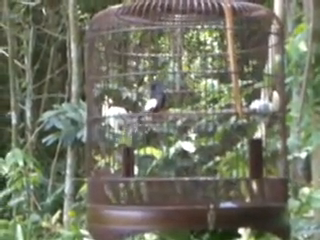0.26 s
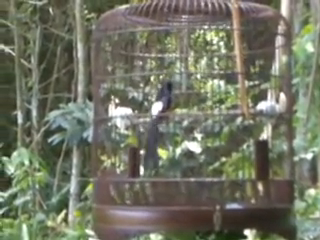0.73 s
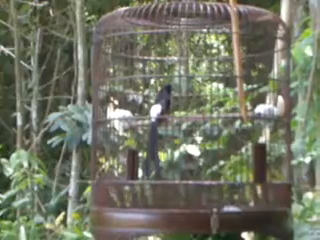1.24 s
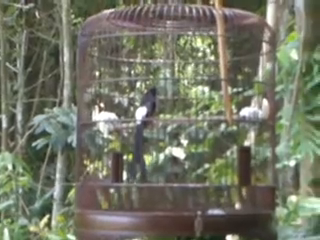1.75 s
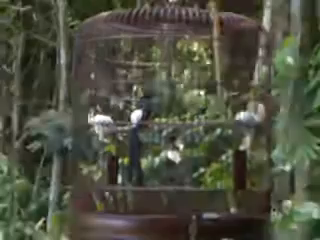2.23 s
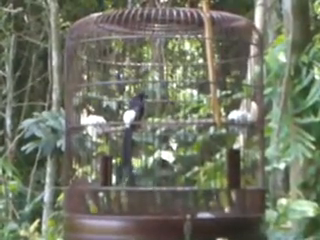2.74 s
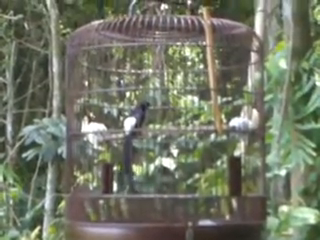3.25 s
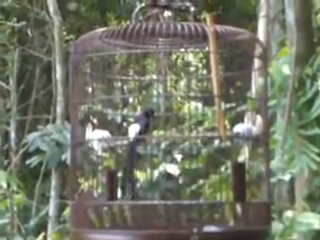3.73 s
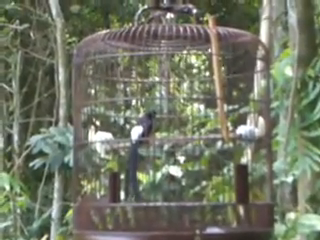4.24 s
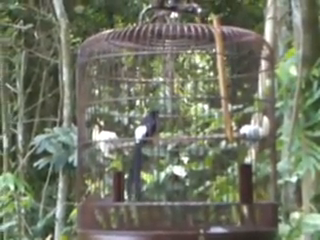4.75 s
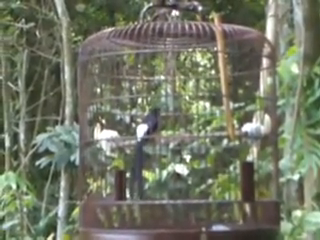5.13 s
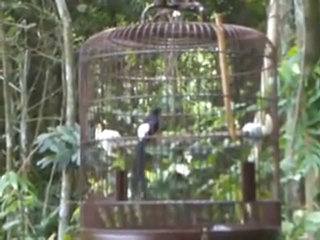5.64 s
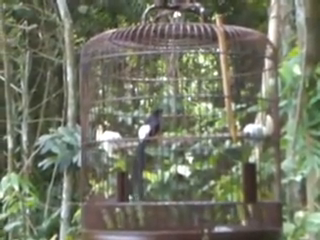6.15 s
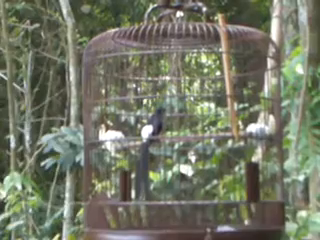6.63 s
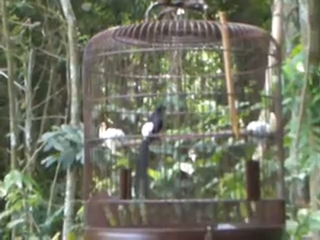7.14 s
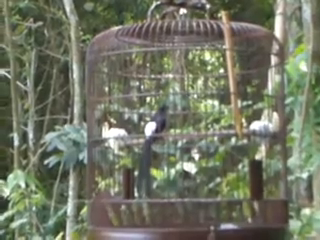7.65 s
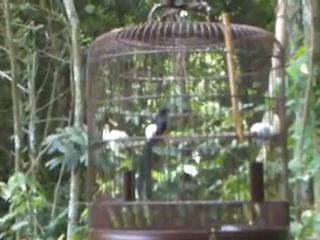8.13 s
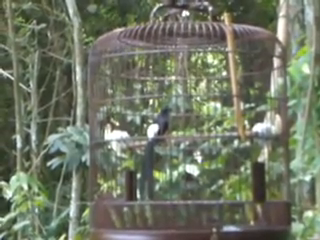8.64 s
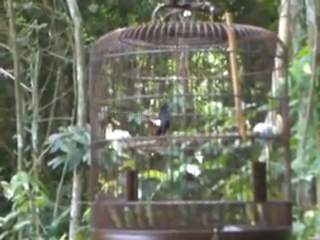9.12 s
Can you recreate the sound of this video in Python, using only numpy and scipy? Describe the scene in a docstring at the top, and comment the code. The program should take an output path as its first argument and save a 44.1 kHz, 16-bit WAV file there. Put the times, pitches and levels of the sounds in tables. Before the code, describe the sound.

Close outdoor pickup of a bird's varied solo, from mellow low slurs to thin, sharp high notes, in separate phrases with brief pauses. Trees return a light, diffuse reverberation over quiet insect hiss and tiny far chirps. The singing ends with a quavering whistle; then comes a quiet gap with faint pips, a growing rustling hiss, and scratchy clacks as the bird moves against its perch.

```python
"""Caged songbird at the edge of a wood

A white-rumped shama whistles in slurs, quavers and quick runs: each note is a pitch line with its own loudness.
Faint overtones and one harsh note join in; echoes and noisy tails stand for the cage, ground and trunks.
Far birds are soft sine tones, and the insects and still air are filtered noise.
Near the end a rustling hiss swells and the bird knocks against its perch: short noise bursts make the cage ring."""
import sys
import numpy as np
from scipy import signal
from scipy.fft import rfft, irfft
from scipy.io import wavfile
from scipy.ndimage import uniform_filter1d

SR = 44100
rng = np.random.default_rng(int(sys.argv[2]) if len(sys.argv) > 2 else 0)


def wav_out(sig):
    """Save sig, one row per channel (or a flat mono array), as 16-bit PCM at SR to the path in sys.argv[1]."""
    wavfile.write(sys.argv[1], SR, np.round(np.clip(np.atleast_2d(sig).T, -1, 1) * 32767).astype(np.int16))


N = 413658
T = np.arange(N) / SR  # time in seconds


def undb(db):
    """Turn decibels into gain."""
    return 10 ** (np.asarray(db) / 20)


def unit(x):
    """Scale a sound to an rms of one."""
    return x / np.sqrt(np.mean(x ** 2))


def colour_db(hz, points):
    """Read a (Hz, dB) curve on a log-frequency axis."""
    f, db = np.transpose(points)
    return np.interp(np.log(np.maximum(hz, 1)), np.log(f), db)


def noise(points, size=N):
    """Noise of unit rms whose spectrum has the given shape."""
    spectrum = rfft(rng.standard_normal(size))
    shape = undb(colour_db(np.fft.rfftfreq(size, 1 / SR), points))
    return unit(irfft(spectrum * shape, size))


def walk(rate, size=N):
    """Random wander that heads for a new value `rate` times a second, with a spread just under one."""
    steps = np.arange(size) / SR * rate
    count = int(steps[-1]) + 2
    return np.interp(steps, np.arange(count), rng.standard_normal(count))


def resonate(x, hz, width_hz):
    """One resonance, with a gain of one at its centre."""
    return signal.lfilter(*signal.iirpeak(hz, hz / width_hz, fs=SR), x)


def gesture(s, hz, db, fade_s=0.0038):
    """Sample indices, pitch line and gain of one note; the muscles round every corner."""
    i = np.arange(max(int(s[0] * SR), 0), min(int(s[-1] * SR), N))
    pitch = uniform_filter1d(np.interp(T[i], s, hz), size=200, mode="nearest")
    gain = uniform_filter1d(undb(np.interp(T[i], s, db)), size=300, mode="nearest")
    gate = np.clip(np.minimum(T[i] - s[0], s[-1] - T[i]) / fade_s, 0, 1)
    return i, pitch, gain * np.sin(gate * np.pi / 2) ** 2


def span(start, end):
    """Times through one note."""
    return np.linspace(start, end, num=400)


def edges_db(t, attack_s, release_s, depth_db=28):
    """A note climbs from far below its level, rounds off there and sinks back."""
    climb = np.maximum(1 - (t - t[0]) / attack_s, 0) ** 2
    sink = np.maximum(1 - (t[-1] - t) / release_s, 0) ** 2
    return -depth_db * (climb + sink)


def whistles(jitter=0.0065, shimmer_db=3.0, overtone_flicker_db=3, song_db=-1.71, edge_hz=3200, edge_db=8,
             slack_hz=1310, slack_db=8, overtone_pulse=.8):
    """Near-pure tones from the syrinx, and apart from them their faint overtones, coloured by the throat."""
    # Overtones of a whistle. Each row: multiple of the pitch, base level in dB.
    overtone_rows = [(2, -38.5), (3, -54.5), (4, -51.5), (5, -49), (6, -54)]
    # How throat and open beak colour the overtones. Each row: frequency in Hz, gain in dB.
    throat = [(1500, 16.5), (2600, -6.5), (3600, -4.5), (5600, 3.5), (7000, 6.5), (8500, 11.5), (10000, -2),
              (14500, 12.5)]
    # Moments when the voice turns hoarse. Each row: start in seconds, end in seconds, pitch scatter as a share.
    hoarse_rows = [(1.599, 1.779, 0.0089), (1.874, 2.08, 0.015), (2.833, 3.119, 0.015),
                   (5.756, 5.82, 0.015), (5.957, 6.033, 0.067)]
    tones, overtones = np.zeros(N), np.zeros(N)
    bend, swing_db = quaver()
    hoarse = sum(share * ((T > start) & (T < end)) for start, end, share in hoarse_rows)
    bend = bend + jitter * walk(500) + hoarse * walk(1500)
    swing_db = swing_db + shimmer_db * walk(120)
    flicker_db = [overtone_flicker_db * walk(150) for _ in overtone_rows]
    for note in (*slurs(), *tews(), *plunges(), *hooks(), *arches()):
        i, hz, gain = gesture(*note)
        hz = hz * (1 + bend[i])
        phase = 2 * np.pi * np.cumsum(hz) / SR
        gain = np.sqrt(2) * gain * undb(song_db + swing_db[i])
        tones[i] += gain * np.sin(phase)
        # high notes are forced harder and gain an edge with every octave
        force_db = edge_db * np.maximum(np.log2(hz / edge_hz), 0)
        # low notes come from a slack, buzzy syrinx: overtones gain with every octave down
        force_db = force_db + slack_db * np.maximum(np.log2(slack_hz / hz), 0)
        # overtones throb and shimmer harder than the tone
        pulse_db = overtone_pulse * swing_db[i]
        for k, (_, db) in enumerate(overtone_rows, 2):
            overtone_db = db + force_db + pulse_db + colour_db(k * hz, throat) + flicker_db[k - 2][i]
            audible = k * hz < SR / 2
            overtones[i] += gain * undb(overtone_db) * np.sin(k * phase) * audible
    return tones, overtones


def quaver(peaked=0.21):
    """The syrinx muscles shake pitch and level together; a negative level swing runs opposite to the pitch."""
    # Quavers laid over the notes. Each row: first crest in seconds, end in seconds, rate in Hz,
    # basic pitch swing as a share, basic level swing in dB.
    shakes = [(.006, 0.081, 44.2, 0.108, 4), (.699, .885, 23.8, .04, 6), (1.156, 1.424, 23.45, .06, 5),
              (1.905, 1.95, 83, 0.057, -1), (2.04, 2.08, 82.8, 0.064, 1.5),
              (3.221, 3.363, 40.92, 0.059, -1.5), (5.122, 5.286, 40.66, 0.08, -2),
              (5.498, 5.588, 61, 0.059, -1.5), (6.724, 6.859, 44.8, 0.052, .5),
              (7.081, 7.162, 67.7, 0.074, -1)]
    bend, swing_db = np.zeros(N), np.zeros(N)
    for crest, end, rate_hz, depth, db in shakes:
        i = np.flatnonzero((T > crest - 1 / rate_hz) & (T < end))
        cycles = (T[i] - crest) * rate_hz
        grip = np.clip(2 * cycles + 1.5, 0, 1) * np.clip((end - T[i]) * rate_hz * 4, 0, 1)
        turn = 2 * np.pi * cycles
        bend[i] += depth * grip * (np.cos(turn) + peaked * np.cos(2 * turn))
        # with a positive swing the tone is pinched briefly in each trough
        swing_db[i] += db * grip * (np.cos(turn) - np.cos(2 * turn) / 4)
    return bend, swing_db


def slurs(release_s=0.0061, last_drop_oct=.05):
    """Drawn-out whistles ease from one pitch to another and droop as the air stops."""
    # Each row: start, length and attack in seconds, start and end pitch in Hz, ease (positive covers most
    # of the way early, negative late), then early, middle and late level in dB before the song's trim.
    slur_rows = [(0, 0.072, 0.0034, 1685, 1558, -1.5, -20, -32, -33),
                 (0.531, 0.37, 0.029, 1085, 1723, 2, -41, -28, -31.5),
                 (1.074, 0.35, 0.045, 1173, 2005, 2, -34, -30.5, -30.5),
                 (1.546, 0.26, 0.03, 3284, 2530, -0.15, -42, -42, -41),
                 (3.226, 0.12, .006, 2310, 2352, 2.5, -17.5, -25, -25),
                 (5.096, .194, .04, 1720, 2235, 15, -23, -24.5, -30),
                 (5.393, .064, 0.037, 748, 1220, 0.14, -25.5, -39.5, -41),
                 (5.752, 0.064, .004, 3140, 2900, 6.5, -41, -41, -33),
                 (5.986, 0.031, 0.0055, 2915, 1654, 2, -45, -60, -51.5),
                 (6.331, .08, 0.032, 1022, 894.5, 3.5, -37, -38.5, -32),
                 (6.68, 0.18, 0.0064, 1500, 2270, 1.7, -21, -21, -30.5),
                 (6.952, 0.0788, 0.046, 703, 1116, -.3, -40, -35, -42)]
    for start, length, attack_s, start_hz, end_hz, ease, *levels_db in slur_rows:
        t = span(start, start + length)
        u = (t - start) / length
        hz = start_hz + (end_hz - start_hz) * np.expm1(-ease * u) / np.expm1(-ease)
        hz = hz * 2 ** (-last_drop_oct * np.maximum(1 - (t[-1] - t) / release_s, 0))
        yield t, hz, np.interp(u, [0, .5, 1], levels_db) + edges_db(t, attack_s, release_s)


def tews(scoop_oct=.18, sag_oct_per_s=1.65, fade_db_per_s=83.5, attack_s=0.019, release_s=.012,
         last_drop_oct=.18):
    """"Tew" notes: the syrinx is flicked tight and let go, so the pitch drops to a lower, sagging tone."""
    # Each row: crest time, rise, drop and hold (from the crest) in seconds, crest and tone pitch in Hz,
    # crest and tone level in dB before the song's trim.
    tew_rows = [(1.885, .01, .009, .057, 2198, 1517, -22, -22.5),
                (2.015, .012, 0.0084, 0.057, 2073, 1568, -22.5, -20.5),
                (2.146, .013, 0.0084, 0.15, 1910, 1520, -17.5, -23),
                (4.685, .015, 0.016, 0.079, 1660, 1067, -25, -38),
                (4.815, 0.012, .013, .055, 1630, 1050, -21, -36),
                (4.961, .01, 0.011, .065, 1660, 1040, -20.5, -30),
                (5.471, .019, 0.021, 0.12, 1905, 1693, -20.5, -24),
                (7.045, 0.021, 0.015, 0.12, 1936, 1738, -20.5, -24.5)]
    for crest, rise, drop, hold, crest_hz, tone_hz, crest_db, tone_db in tew_rows:
        t = span(crest - rise, crest + hold)
        before, after = np.maximum(crest - t, 0), np.maximum(t - crest, 0)
        tension = np.exp(-(after / drop) ** 2)
        letting_go = np.maximum(1 - (hold - after) / release_s, 0)
        flat_oct = scoop_oct * (before / rise) ** 2 + sag_oct_per_s * after + last_drop_oct * letting_go
        hz = (tone_hz + (crest_hz - tone_hz) * tension) * 2 ** -flat_oct
        db = tone_db + (crest_db - tone_db) * tension - fade_db_per_s * after
        yield t, hz, db + edges_db(t, attack_s, release_s)


def plunges(power=1.6, settle_s=0.0044, swell_db_per_s=332.5, attack_s=0.0079, release_s=0.0054):
    """High "tsee" notes: each settles toward its top, swells, then falls faster and faster."""
    # Each row: start, hold and plunge in seconds, start, top and end pitch in Hz, base level in dB.
    plunge_rows = [(2.386, .033, .061, 6500, 6120, 2190, -23),
                   (2.542, 0.0071, 0.035, 6400, 6130, 2700, -23),
                   (2.659, 0.0061, 0.027, 6500, 6320, 3870, -23.5),
                   (3.65, 0.019, 0.052, 3200, 4680, 2700, -24.5),
                   (3.85, 0.026, 0.05, 4860, 4735, 2770, -27),
                   (4.058, .032, 0.035, 3400, 4730, 3170, -26.5),
                   (4.283, .03, 0.035, 3700, 4600, 3000, -28), (5.966, .005, .033, 6260, 7360, 2020, -29.5)]
    # The throat favours the middle pitches. Each row: pitch in Hz, gain in dB.
    throat_gain = [(2300, -25.5), (3000, -23.5), (3600, -6), (4300, -1), (4900, 1.5), (6000, -8.5),
                   (7500, -19)]
    for start, hold, plunge, start_hz, top_hz, end_hz, db in plunge_rows:
        knee = start + hold
        t = span(start, knee + plunge)
        hz = top_hz + (start_hz - top_hz) * np.exp((start - t) / settle_s)
        hz = hz + (end_hz - top_hz) * (np.maximum(t - knee, 0) / plunge) ** power
        level_db = db + colour_db(hz, throat_gain) - swell_db_per_s * np.maximum(knee - t, 0)
        yield t, hz, level_db + edges_db(t, attack_s, release_s)


def hooks(power=1.5, attack_s=0.024, release_s=0.011):
    """"Wee" notes dip to a trough and hook upward, at an even level between their soft edges."""
    # Each row: trough time, dip and rise in seconds, start, trough and end pitch in Hz,
    # level in dB before the song's trim.
    hook_rows = [(3.505, 0.026, .064, 1954, 1527, 2630, -23), (3.731, .02, 0.037, 1990, 1940, 2720, -21.5),
                 (3.939, 0.019, .042, 1980, 1942, 2716, -23), (4.149, .02, 0.042, 2050, 1939, 2800, -24),
                 (4.367, .017, 0.039, 2090, 2005, 2767, -22)]
    for trough, dip, rise, start_hz, trough_hz, end_hz, db in hook_rows:
        t = span(trough - dip, trough + rise)
        early = t < trough
        away = np.abs(t - trough) / np.where(early, dip, rise)
        hz = trough_hz + (np.where(early, start_hz, end_hz) - trough_hz) * away ** power
        yield t, hz, db + edges_db(t, attack_s, release_s)


def arches(turn=1.35, push_db=22.5, attack_s=0.0054, release_s=0.0045):
    """Short notes: the pitch rounds over a crest while one push of air swells the note."""
    # Each row: crest time, rise and fall in seconds, start, crest and end pitch in Hz,
    # push time and push width in seconds, level in dB before the song's trim.
    arch_rows = [(1.785, .012, 0.021, 2566, 2453, 2390, 1.79, 0.012, -24),
                 (2.893, .046, .026, 996, 1530, 1150, 2.893, 0.017, -21),
                 (2.944, 0.028, 0.022, 1081, 1610, 1014, 2.941, 0.022, -25),
                 (2.999, .034, 0.013, 1065, 1608, 988, 2.993, .014, -23.5),
                 (3.101, 0.043, 0.017, 853, 1414, 1024, 3.099, 0.017, -28),
                 (3.214, 0.024, 0.023, 1305, 2370, 2330, 3.217, 0.01, -15.5),
                 (3.461, 0.021, .02, 3300, 3627, 3080, 3.461, .012, -22),
                 (5.779, 0.039, 0.048, 3500, 4250, 2246, 5.789, 0.026, -21.5),
                 (6.052, .036, 0.022, 1813, 3476, 1700, 6.051, 0.0099, -22),
                 (6.496, 0.019, 0.026, 1570, 1784, 913, 6.501, .014, -20),
                 (6.552, 0.028, 0.02, 975, 1718, 1120, 6.554, 0.018, -20.5),
                 (6.668, .015, .023, 1905, 1930, 1447, 6.675, 0.023, -19.5)]
    for crest, rise, fall, start_hz, crest_hz, end_hz, push, width, db in arch_rows:
        t = span(crest - rise, crest + fall)
        early = t < crest
        # each flank follows `turn` radians of a sine
        flank = np.sin(turn * (t - crest) / np.where(early, rise, fall)) / np.sin(turn)
        hz = crest_hz + (np.where(early, start_hz, end_hz) - crest_hz) * flank ** 2
        swell_db = push_db * np.expm1(-((t - push) / width) ** 2)
        yield t, hz, db + swell_db + edges_db(t, attack_s, release_s)


def squawk(jitter=.01, rasp_db=4.5):
    """One reedy note: the membranes slap shut unevenly and give a rough stack of partials."""
    # Path of the note. Each row: time in seconds, pitch in Hz, base level in dB.
    path = [(5.697, 1258, -58.5), (5.713, 1442, -34), (5.731, 1464, -39), (5.75, 1430, -40.5),
            (5.762, 1186, -41.5), (5.767, 1100, -49)]
    # Each row: multiple of the pitch, level in dB relative to the path.
    partials = [(2, -1), (3, 1.5), (4, -15.5), (5, -8.5), (6, -13), (7, -27.5), (8, -29)]
    out = np.zeros(N)
    i, hz, gain = gesture(*np.transpose(path))
    phase = 2 * np.pi * np.cumsum(hz * (1 + jitter * walk(974, len(i)))) / SR
    for k, (_, db) in enumerate(partials, 2):
        out[i] += gain * undb(db + rasp_db * walk(700, len(i))) * np.sin(k * phase)
    return out


def knocks(contact_s=0.0092, knock_db=-1):
    """Short scratchy blows on the light, heavily damped cage make dry clacks."""
    # Feet and wings against perch and bars. Each row: time in seconds, level in dB before the overall trim.
    blow_rows = [(8.769, -47.5), (9.078, -32), (9.238, -58), (9.33, -26.5), (9.337, -34), (9.346, -53)]
    # What the cage rings with. Each row: frequency in Hz, width in Hz, relative level in dB.
    cage = [(330, 140, -6), (1390, 920, 0), (2140, 670, 0.5), (3670, 480, 7), (4630, 140, 2)]

    def body(x):
        """The cage's resonances ring side by side."""
        return sum(undb(db) * resonate(x, hz, width) for hz, width, db in cage)

    blows = sum(undb(db) * (T >= s) * np.exp(-np.abs(T - s) / contact_s) for s, db in blow_rows)
    scratch = rng.standard_normal(N)
    return undb(knock_db) * body(scratch * blows) / np.std(body(scratch))


def soft_tap(tap_s=7.798, hz=560, width_hz=400, decay_s=0.024, db=-60):
    """One dull, faint tap: a dying burst of low, narrow noise."""
    blow = (T >= tap_s) * np.exp(-np.abs(T - tap_s) / decay_s)
    thud = resonate(resonate(rng.standard_normal(N), hz, width_hz), hz, width_hz)
    return undb(db) * blow * unit(thud)


def far_birds(low_hz=6400, high_hz=6760, chirp_s=0.053, chirp_gap_s=.067, chirp_db=-59,
              pip_hz=4520, pip_s=0.096, pip_db=3, waver=0.016):
    """Sine tones: thin paired chirps that rise and round over, and short wavering pips."""
    # Chirps of a small distant bird: the start of each pair in seconds.
    pair_starts = [1.02, 1.147, 1.5, 1.83, 2.19, 2.88, 3.2, 3.53, 3.84]
    # Another far caller pips evenly, in bouts. Each row: first pip, end and period in seconds,
    # first and last level in dB before the lift pip_db.
    bouts = [(.24, 2.4, .205, -71.5, -69.5), (4.8, 7.8, .268, -69, -68), (8.115, 8.9, .23, -68, -57)]
    out = np.zeros(N)
    u = np.linspace(0, 1, int(chirp_s * SR))
    for s in np.add.outer(pair_starts, [0, chirp_gap_s]).ravel():
        hz = low_hz + (high_hz - low_hz) * np.sin(2 * u) + 20 * walk(100, len(u))
        chirp = np.sin(np.pi * u) * np.sin(2 * np.pi * np.cumsum(hz) / SR)
        out[int(s * SR):][:len(u)] += undb(chirp_db) * chirp
    u = np.linspace(0, 1, int(pip_s * SR))
    pips = np.zeros(N)
    for first, end, period, first_db, last_db in bouts:
        times = np.arange(first, end, period)
        for s, db in zip(times, np.linspace(first_db, last_db, len(times))):
            pips[int((s - pip_s / 2) * SR):][:len(u)] += undb(db + pip_db) * np.sin(np.pi * u) ** 2
    pip_phase = 2 * np.pi * np.cumsum(pip_hz * (1 + waver * walk(400))) / SR
    return out + pips * np.sin(pip_phase)


def far_whistles(sag=0.022):
    """Each distant whistle swells, sags a little in pitch and fades."""
    # Each row: start in seconds, length in seconds, middle pitch in Hz, peak level in dB.
    far_notes = [(7.82, 0.26, 1670, -74), (7.83, 0.21, 825, -72.5), (7.878, 0.095, 1100, -69),
                 (8.276, 0.14, 1352, -64), (8.665, .1, 1340, -60), (8.743, 0.094, 929, -56.5),
                 (9.118, 0.096, 763, -49.5)]
    out = np.zeros(N)
    for s, length, hz, db in far_notes:
        u = np.linspace(0, 1, int(length * SR))
        phase = 2 * np.pi * np.cumsum(hz * (1 + sag * (.5 - u))) / SR
        out[int(s * SR):][:len(u)] += undb(db) * np.sin(np.pi * u) * np.sin(phase)
    return out


def wood(x, direct=1, t60_s=0.62, tail_db=-20, near_t60_s=0.31, near_db=-16.5, far_t60_s=1.0, far_db=-28,
         gap_s=0.0054):
    """A few clear echoes, quick scatter from nearby leaves, then tails from near and far trunks."""
    # Early echoes. Each row: delay in seconds, level in dB.
    echo_rows = [(.0063, -18.5), (0.0097, -11), (0.013, -21), (0.0155, -26.5)]
    t = T[:SR]
    onset = np.clip((t - gap_s) / gap_s, 0, 1)
    # leaves and twigs scatter short waves far better than long ones
    leaves = [(900, 2), (1500, -4), (2400, 4.5), (3200, 8.0), (6000, 10.5), (12000, 5.5)]
    leaves_db = colour_db(np.fft.rfftfreq(len(t), 1 / SR), leaves)
    response = np.zeros(len(t))
    for t60, db in ((near_t60_s, near_db + leaves_db), (t60_s, tail_db + leaves_db), (far_t60_s, far_db)):
        decay = onset * undb(-60 * t / t60)
        scatter = rfft(rng.standard_normal(len(t)) * decay / np.linalg.norm(decay))
        response += irfft(scatter * undb(db), len(t))
    response[0] += direct
    for delay, db in echo_rows:
        response[int(delay * SR)] += undb(db)
    return signal.fftconvolve(x, response)[:N]


def lingering_echo(hz=1700, width_hz=170, start_db=-53, t60_s=1.5):
    """The far trees ring with an earlier phrase: a narrow band of noise dying away from the start."""
    ring = resonate(resonate(rng.standard_normal(N), hz, width_hz), hz, width_hz)
    return unit(ring) * undb(start_db - 60 * T / t60_s)


def background(insect_hz=7800, insect_width_hz=700, insect_db=-67, flutter_db=2.1, insect_share_db=-12,
               hum_hz=590, hum_db=-74):
    """Shaped noise for still air, insects and a swelling rustle, plus a faint sine hum that fades."""
    # Spectra of still air with its insects, and of the rustle. Each row: frequency in Hz, relative dB per Hz.
    air_spectrum = [(18, -37), (30, -5), (97, -0.5), (202, -6), (561, -9.5), (1140, -17.5), (1680, -18),
                    (2130, -24), (4090, -21), (4660, -13), (5450, -24), (6890, -18.5), (7860, -12),
                    (8720, -18), (15500, -15)]
    rustle_spectrum = [(18, -49), (30, -8.5), (55, 1), (144, -3.5), (420, -9.5), (561, -6.5), (656, -13.5),
                       (767, -10), (874, -13), (2910, -24), (4660, -17), (6720, -21.5), (7650, -7),
                       (8720, -20.5), (15500, -13.5)]
    # Each row: time in seconds, rustle level in dB before its flutter.
    swell_rows = [(7.3, -82.5), (8.1, -70), (8.4, -55.5), (8.7, -49.5), (9.0, -43.5), (9.38, -38.5)]
    # Each row: time in seconds, still-air level in dB before its slight wander.
    air_levels = [(0, -59), (2, -59.5), (4, -62.5), (6, -59.5), (7.2, -61), (7.7, -58), (9.38, -61)]
    swell = undb(np.interp(T, *np.transpose(swell_rows)))
    air = noise(air_spectrum) * undb(np.interp(T, *np.transpose(air_levels)) + 0.26 * walk(7.3))
    rustle = noise(rustle_spectrum) * swell * undb(flutter_db * walk(25))
    insects = resonate(rng.standard_normal(N), insect_hz, insect_width_hz)
    insects = unit(resonate(insects, insect_hz, insect_width_hz))
    # this high band also grows with the rustle
    insects *= np.hypot(undb(insect_db), swell * undb(insect_share_db)) * undb(flutter_db * walk(30))
    hum_fade = np.interp(T, [2, 4.5], [1, 0])
    hum = np.sin(2 * np.pi * hum_hz * T) * undb(hum_db + 2 * walk(3.8)) * hum_fade
    return air + rustle + insects + hum


def scene(overtone_direct=0.77, overtone_db=3):
    """The shama and its neighbours among the trees."""
    tones, overtones = whistles()
    # the beak beams its overtones away, so a larger share of them arrives by way of the leaves
    sheen = undb(overtone_db) * wood(overtones, direct=overtone_direct)
    sources = tones + squawk() + far_birds() + far_whistles() + knocks() + soft_tap()
    return (wood(sources) + sheen + lingering_echo() + background())[None]


def record(dry, top_hz=15750):
    """A steep low-pass filter cuts the top of the treble."""
    return signal.sosfilt(signal.ellip(10, .1, 70, top_hz, fs=SR, output="sos"), dry)


dry = scene()
out = record(dry)
wav_out(out)
```